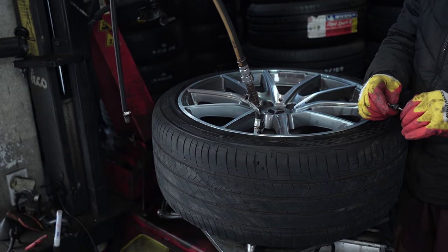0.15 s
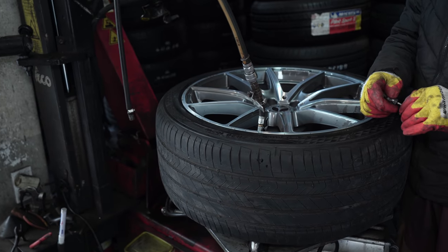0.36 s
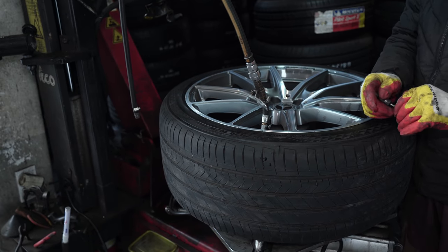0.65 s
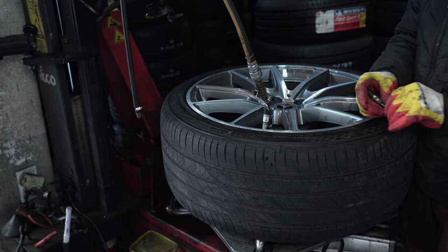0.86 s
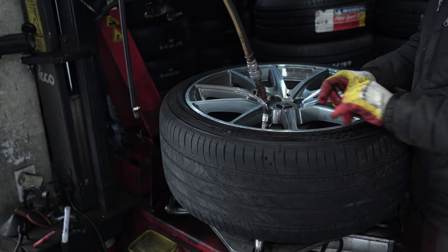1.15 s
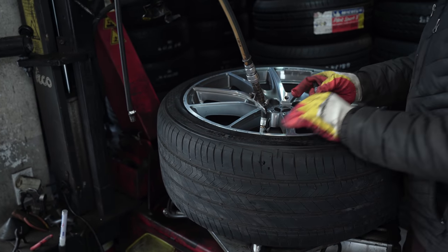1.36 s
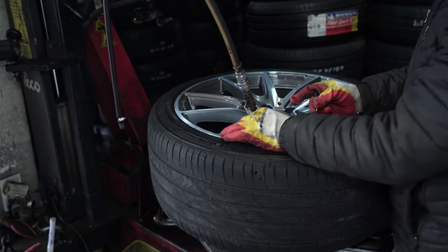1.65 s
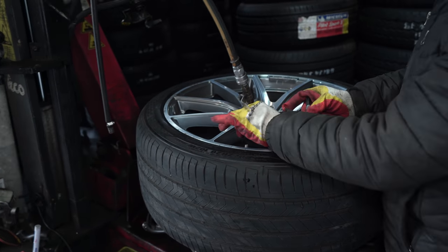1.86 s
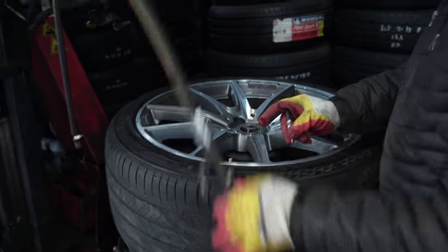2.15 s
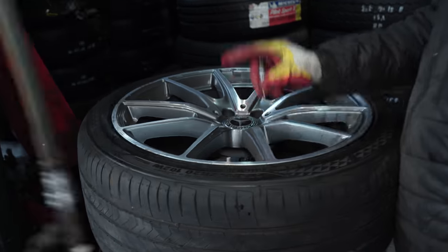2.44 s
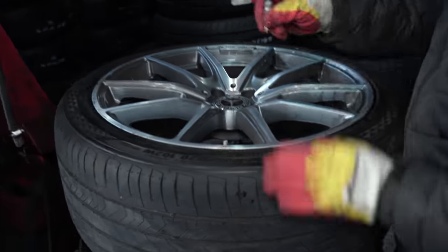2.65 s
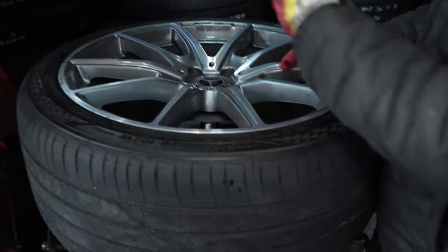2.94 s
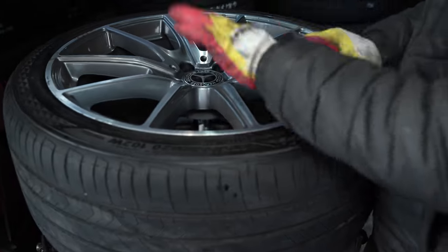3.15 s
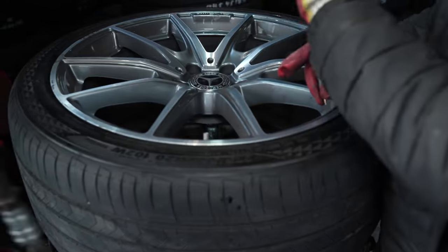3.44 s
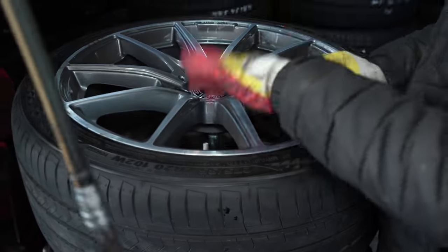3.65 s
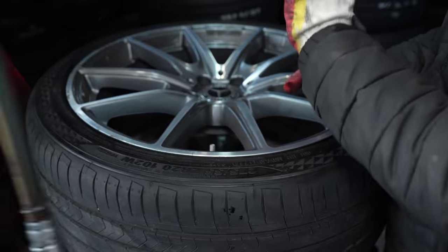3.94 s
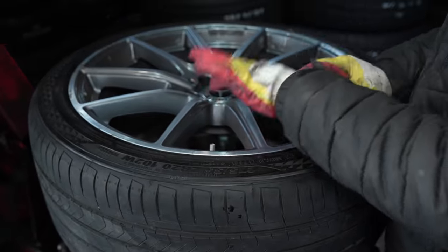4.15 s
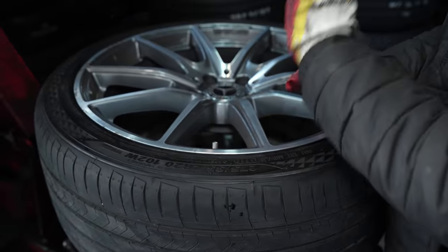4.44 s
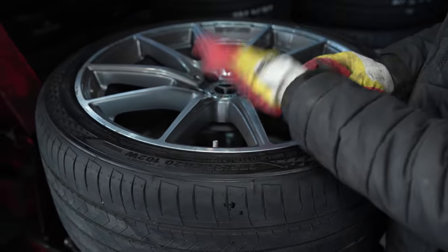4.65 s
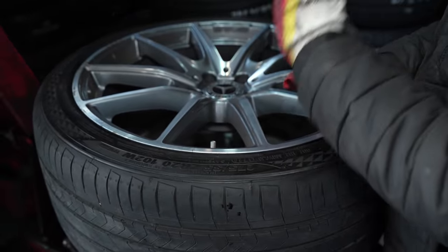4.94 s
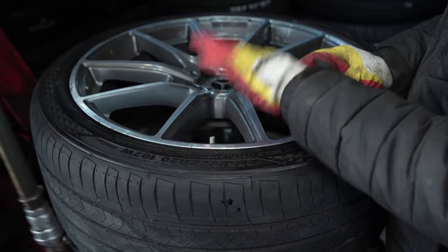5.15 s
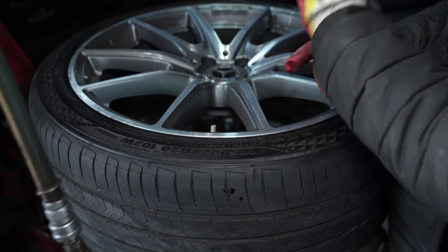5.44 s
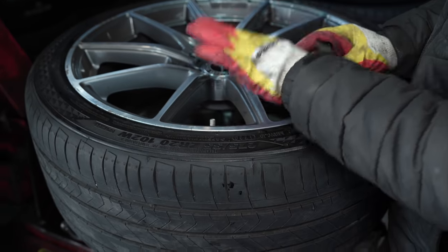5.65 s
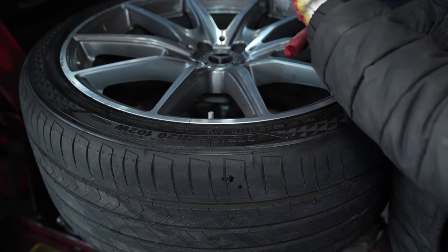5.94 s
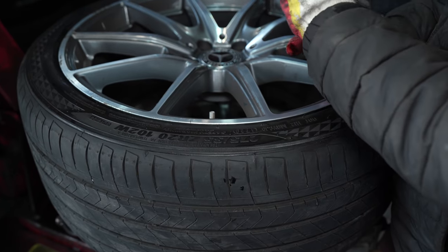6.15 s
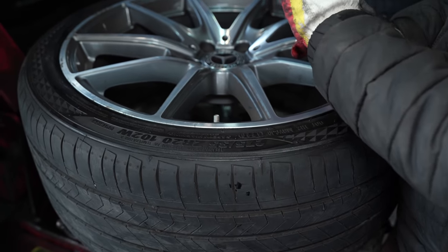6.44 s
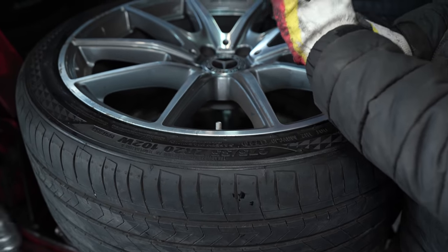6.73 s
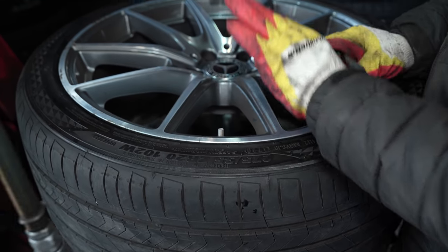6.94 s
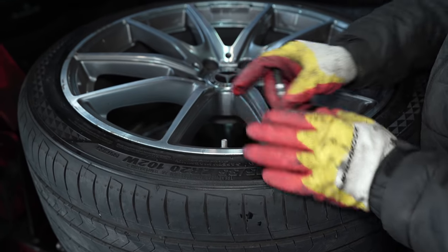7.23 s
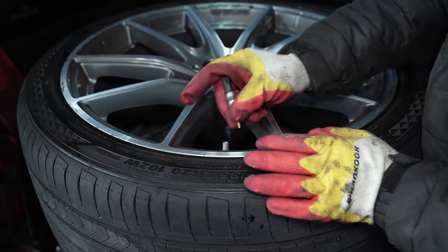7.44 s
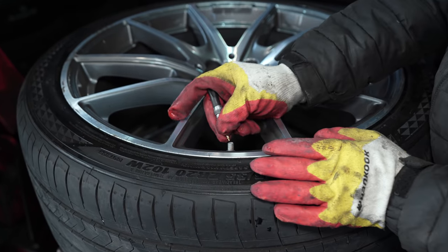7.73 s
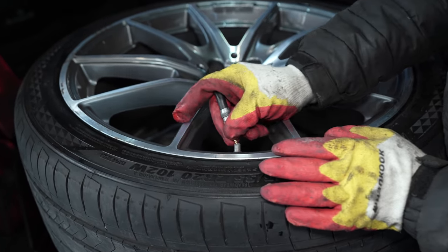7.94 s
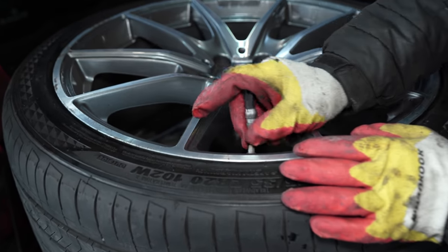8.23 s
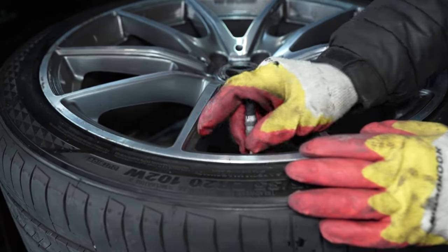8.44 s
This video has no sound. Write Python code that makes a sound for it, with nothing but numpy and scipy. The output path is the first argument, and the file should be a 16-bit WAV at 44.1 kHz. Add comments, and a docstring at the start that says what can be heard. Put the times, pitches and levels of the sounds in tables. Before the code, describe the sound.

From 0 to 1.7 seconds, air rushes into a car tyre as a muffled, cavity-coloured roar over an uneven, very low throb and hum; at about 1.3 the hiss grows slightly as the chuck is gripped. At 1.7 it leaks sharply, and at 1.8 comes off with a coarse, rasping spit. The low rush stops and a loud, bright, shrill hiss streams from the open valve, very slowly weakening. A soft puff at 2.4 is followed by stronger gruff puffs at 3.1, 3.7, 4.1, 4.6, 5.1 and 5.6 as a gloved hand crosses the jet. Steady hiss continues, with a dull pass at 6.8 and another at 7.4. Around 7.5 the glove cups the jet, making it hollower, with small flutters and faint short hums. From 8.3 it is choked ever faster, nearly silent by 8.6 over faint machine drone. Close microphone, light metallic and workshop echoes.

```python
"""A rush of air over a low throb and hum: a car tyre is filled through an air hose in a repair shop.
The chuck leaks, comes off with a spit, and air hisses from the open valve stem.
A gloved hand sweeps through the jet again and again, each pass a gruff puff; then it cups and plugs the stem.
Air sounds are noise under moving spectra; tyre cavity and alloy wheel are resonant modes.
Throb and hums are unsteady tones; delays and decaying noise tails make the echoes."""
import sys
import numpy as np
from scipy import signal
from scipy.fft import rfft, irfft, next_fast_len
from scipy.io import wavfile
from scipy.ndimage import uniform_filter1d, map_coordinates

SR = 44100
rng = np.random.default_rng(int(sys.argv[2]) if len(sys.argv) > 2 else 0)


def dump_mix(stems):
    """Bounce the given channels to the path in sys.argv[1] as a 16-bit WAV at rate SR."""
    frames = np.atleast_2d(stems).T  # one column per channel
    limited = np.clip(frames, -1, 1)  # hard clip at full scale
    pcm = np.round(limited * 32767).astype(np.int16)
    wavfile.write(sys.argv[1], SR, pcm)


N = 379260

# very low throb: t/s, level/dB
THROB_LEVEL = [(0.0, -26), (0.12, -18), (0.24, -36), (0.48, -19.5), (1.1, -34), (1.7, -13.5), (1.82, -15),
               (1.92, -50), (2.27, -52), (2.39, -37), (2.68, -30.5), (5.53, -53.5), (6.47, -36.5),
               (6.56, -44.5), (7.57, -40), (7.91, -51), (8.38, -31), (8.6, -48)]
# air rushing into the tyre, relative spectrum: f/Hz, density/dB per Hz
FILL_SPECTRUM = [(18, -31), (30, -22), (130, -26.5), (258, -18.5), (447, -26), (509, -19.5), (860, -23),
                 (1700, -23.5), (2100, -30.5), (3450, -30.5), (4260, -36), (5250, -36.5), (7780, -49),
                 (13900, -58), (15800, -65)]
# air modes of the tyre: f/Hz, width/Hz, lift/dB
CAVITY_MODES = [(88, 24, 3), (259, 5.4, 6), (291, 8.7, 2.5), (506, 36, -1.5), (514, 31, 6), (1020, 14, 4),
                (1550, 180, 1), (1750, 55, 1.5)]
# drone of the shop machines, relative spectrum: f/Hz, density/dB per Hz
MACHINE_SPECTRUM = [(30, -8), (80, 0), (140, -22), (230, 2), (400, -6), (700, 2), (1500, -6.5), (4000, -51),
                    (15000, -46)]
# free jet, relative spectrum: f/Hz, density/dB per Hz
OPEN_JET_SPECTRUM = [(35, -58), (60, -26), (167, -39.5), (436, -28), (604, -33), (727, -23), (1080, -24),
                     (1500, -18), (1810, -18), (2390, -13.5), (3310, -11), (4280, -9), (7490, -10),
                     (12800, -1), (15800, -13)]
# peaks and dips of the free jet: f/Hz, width/Hz, lift/dB
JET_BANDS = [(2900, 860, 0.7), (4320, 220, 2.5), (4900, 170, 2), (6300, 300, 2.2), (7500, 500, -2.2),
             (8800, 280, 1.2), (10100, 460, 0), (11200, 320, 1), (12400, 570, -2), (14200, 350, -1),
             (14950, 450, 3), (15700, 300, 1.5)]
# jet under the glove, relative spectrum: f/Hz, density/dB per Hz
CUPPED_JET_SPECTRUM = [(35, -61), (60, -23), (286, -16.5), (322, -27), (370, -22), (576, -24.5), (762, -15),
                       (985, -23.5), (1240, -16.5), (1940, -8.5), (2280, -7.5), (3720, -7), (6400, -8.5),
                       (8200, -10), (10800, 1.5), (14700, -2.5), (15800, -7.5)]
# shrill band, wandering as hands and microphone move: t/s, centre f/Hz, width/Hz, lift/dB
SHRILL_BAND = [(2.0, 11400, 900, 0), (2.4, 12400, 1100, 2.5), (3.1, 12400, 1000, -1),
               (3.55, 12600, 1300, 5), (4.15, 13100, 480, 3.5), (5.6, 12950, 450, 3.5),
               (6.3, 13100, 910, 4.5), (7.4, 12470, 850, 4), (8.3, 11200, 900, 1.5)]
# something crosses the jet: start t/s, length/s, level/dB, top of the roar at mid-stroke f/Hz,
# rasp lift/dB, share of the stroke spent entering/0-1
JET_PASSES = [(1.802, 0.06, -19, 6000, -3, 0.2), (1.828, 0.031, -10.5, 6600, 9, 0.5),
              (1.85, 0.18, -24, 3530, 5, 0.36), (2.002, 0.064, -21, 5400, 3, 0),
              (2.438, 0.22, -27.5, 2100, -2, 0.1), (3.084, 0.32, -20.5, 2970, 0, 0.2),
              (3.666, .225, -17.5, 4150, -1, 0.06), (4.121, 0.21, -18.5, 3830, 0.5, 0.06),
              (4.584, 0.23, -17.5, 5240, 1, 0.08), (5.078, 0.24, -19, 4840, -0.5, 0.08),
              (5.59, 0.24, -19, 3100, 3.5, 0.11), (6.838, 0.42, -32, 1650, -2, 0.17),
              (7.355, 0.3, -25, 3020, -1, 0.44), (7.578, 0.18, -37.5, 1000, 5, 0.1),
              (7.76, 0.13, -30.5, 4500, 2, 0.2), (8.098, 0.25, -31, 3400, 6, 0.27)]
# roar of the deflected jet, relative spectrum: f/Hz, density/dB per Hz
ROAR_SPECTRUM = [(40, -34), (130, -20), (280, -15), (520, -13), (780, -5), (1200, -3.5), (2000, 0.5),
                 (3200, 4.5), (5000, 4.5), (9000, 4.5), (16000, 7)]
# modes of the alloy wheel: f/Hz, width/Hz, lift/dB
WHEEL_MODES = [(500, 27, 3.5), (707, 12, -4), (1014, 28, 4.5), (1380, 26, 3), (1440, 130, 2), (2016, 26, 4),
               (2767, 39, 4), (3660, 49, 2), (4320, 180, 1.5), (5120, 64, 3.5), (6360, 200, 0.5)]
# echo of the jet off the wheel: t/s, delay/ms, strength/factor
WHEEL_ECHO = [(1.8, 2.36, .1), (2.15, 2.66, 0.24), (2.55, 2.6, 0.14), (2.85, 2.7, 0.062), (6.5, 2.7, 0.084),
              (8.6, 2.34, 0.12)]
# shop reverberation: f/Hz, t60/s
SHOP_DECAY = [(100, 1), (500, 0.77), (2000, 0.54), (6000, 0.19), (15000, 0.37)]
# faint short hums: start t/s, length/s, f/Hz, level/dB
SHORT_HUMS = [(7.615, 0.15, 292, -46), (7.64, 0.1, 733, -41), (7.844, .19, 324, -45.5)]
# low peaks and dips at the microphone's place: f/Hz, width/Hz, lift/dB
LOW_END_MODES = [(35, 18, 8.5), (100, 12, 1.5), (144, 44, -6.5), (170, 13, 3)]

TIME = np.arange(N) / SR
FFT_SIZE, HOP = 512, 128
FRAME_S = np.arange(N // HOP + 5)[:, None] * HOP / SR
BIN_HZ = np.fft.rfftfreq(FFT_SIZE, 1 / SR)

THROB_HZ = 15
HUM_HZ, HUM_FILLING_DB, HUM_OPEN_DB = 56, -40, -64
FILL_DB, FILL_HISS_DB = -28, 0.5  # hiss is relative to the fill
GRIP_S, GRIP_LENGTH_S, GRIP_HISS_DB = 1.25, 0.15, 1.5  # the hand takes hold of the chuck: more hiss
LEAK_S, LEAK_RISE_S, LEAK_DB = 1.717, 0.053, -14  # the loosened chuck leaks
CHUCK_OFF_S, CHUCK_FADE_S = 1.818, 0.022
SPIT_DB, SPIT_FADE_S = 6, 0.15  # coarser while the chuck is still in front of the jet
JET_DB, JET_SAG_DB_PER_S = -17, 0.3369  # weakens as the tyre empties
CUP_S, CUP_LENGTH_S, OPEN_CUPPING = 7.54, 0.13, 0.073  # cupping/0-1 before the glove closes
PLUG_S, PLUG_LENGTH_S, PLUG_DB = 8.326, 0.27, -45
SHOP_BUILD_S = 0.058  # time for the echoes to gather
EDGE_HZ = 15850


def gain_of(db):
    """Decibels to a factor."""
    return 10 ** (np.asarray(db) / 20)


def evened(x):
    """Scaled to rms 1."""
    return x / np.sqrt(np.mean(x ** 2) + 1e-20)


def ramp(t, start_s, length_s):
    """Rises from 0 to 1 over a length of time."""
    return np.clip((t - start_s) / length_s, 0, 1)


def read(points, hz):
    """A curve interpolated on a log-frequency axis."""
    f, value = np.transpose(points)
    return np.interp(np.log(hz + 1), np.log(f + 1), value)


def follow(rows, t):
    """Each column of a curve at the times t."""
    s, *columns = np.transpose(rows)
    return [np.interp(t, s, column) for column in columns]


def wander(per_s):
    """A slow random drift of rms 1."""
    knots = rng.standard_normal(400)
    return evened(np.interp(TIME * per_s, np.arange(len(knots)), knots))


def in_band(shape, band):
    """Scales a spectrum so that noise given its shape has rms 1 inside the band."""
    return shape / np.sqrt(np.mean(shape ** 2 * band, axis=-1, keepdims=True) + 1e-20)


def turbulence(shape, flutter_db, patchy_db):
    """Noise under a moving spectrum; eddies shake all bands at once and in patches."""
    size = (len(FRAME_S), len(BIN_HZ))
    flutter = evened(uniform_filter1d(rng.standard_normal((size[0], 1)), size=4, axis=0))
    patches = uniform_filter1d(rng.standard_normal(size), size=18, axis=0)
    patches = evened(uniform_filter1d(patches, size=12, axis=1))
    noise = rng.standard_normal(N + 1024)
    white = signal.stft(noise, nperseg=FFT_SIZE, noverlap=FFT_SIZE - HOP)[2].T[:size[0]]
    shaped = white * shape * gain_of(flutter_db * flutter + patchy_db * patches)
    return signal.istft(shaped.T, nperseg=FFT_SIZE, noverlap=FFT_SIZE - HOP)[1][:N]


def ring(x, modes):
    """Each mode lifts a narrow band and rings on; a negative lift cuts a dip."""
    size = next_fast_len(N + SR // 2, True)
    f = np.fft.rfftfreq(size, 1 / SR)
    body = 1 + sum((gain_of(db) - 1) / (1 + 2j * (f - hz) / width) for hz, width, db in modes)
    return irfft(rfft(x, size) * body, size)[:N]


def delayed(x, ms):
    """The sound after a path whose length changes."""
    return map_coordinates(x, [np.arange(N) - ms * SR / 1000], order=3)


def rumble(throb_waver_hz=1.5, wavers_per_s=13, hum_fade_s=0.064):
    """A very low throb and an unsteady hum, both strongest while the hose feeds the tyre."""
    throb_turns = np.cumsum(THROB_HZ + throb_waver_hz * wander(wavers_per_s)) / SR
    throb_db = follow(THROB_LEVEL, TIME)[0]
    throb = np.sqrt(2) * gain_of(throb_db) * np.sin(2 * np.pi * throb_turns)
    hum_db = HUM_FILLING_DB + (HUM_OPEN_DB - HUM_FILLING_DB) * ramp(TIME, CHUCK_OFF_S, hum_fade_s)
    unsteady = wander(wavers_per_s) + 1j * wander(wavers_per_s)
    hum = (unsteady * np.exp(2j * np.pi * HUM_HZ * TIME)).real
    return throb + gain_of(hum_db) * hum


def filling(hiss_hz=2200):
    """Air roars into the tyre, muffled by rubber and coloured by the cavity, until the chuck is off."""
    hiss_db = FILL_HISS_DB + GRIP_HISS_DB * ramp(FRAME_S, GRIP_S, GRIP_LENGTH_S)
    shape = in_band(gain_of(read(FILL_SPECTRUM, BIN_HZ)), BIN_HZ < hiss_hz)
    shape = shape * gain_of(FILL_DB + hiss_db * (BIN_HZ > hiss_hz))
    seated = 1 - ramp(TIME, CHUCK_OFF_S, CHUCK_FADE_S)
    return ring(seated * turbulence(shape, flutter_db=0.67, patchy_db=1.04), CAVITY_MODES)


def machines(level_db=-52):
    """The dull, steady noise of the shop's machines."""
    colour = gain_of(read(MACHINE_SPECTRUM, np.fft.rfftfreq(N, 1 / SR)))
    return gain_of(level_db) * evened(irfft(rfft(rng.standard_normal(N)) * colour, N))


def jet(roar_hz=8500, roar_db=-0.7, roar_follows=0.63, plug_curve=2.17,
        chuck_cupping=0.6, chuck_treble_db=-2, cup_db=0.75):
    """The jet hisses with a shrill band; chuck and glove hollow it, throttling takes treble first."""
    leak_db = LEAK_DB * (1 - ramp(FRAME_S, CHUCK_OFF_S, CHUCK_FADE_S))
    plug_db = PLUG_DB * ramp(FRAME_S, PLUG_S, PLUG_LENGTH_S) ** plug_curve  # ever faster
    throttle_db = leak_db + plug_db
    open_s = np.maximum(FRAME_S - CHUCK_OFF_S, 0)
    chuck_near = np.exp(-(open_s / SPIT_FADE_S) ** 2)
    glove_cupping = ramp(FRAME_S, CUP_S, CUP_LENGTH_S)
    cupping = np.clip(OPEN_CUPPING + chuck_cupping * chuck_near + glove_cupping, 0, 1)

    bands_db = sum(lift * np.exp(-((BIN_HZ - hz) / width) ** 2) for hz, width, lift in JET_BANDS)
    free_db = read(OPEN_JET_SPECTRUM, BIN_HZ) + bands_db
    colour_db = (1 - cupping) * free_db + cupping * read(CUPPED_JET_SPECTRUM, BIN_HZ)

    centre_hz, width_hz, lift_db = follow(SHRILL_BAND, FRAME_S)
    shrill_db = lift_db * np.exp(-((BIN_HZ - centre_hz) / width_hz) ** 2)
    treble_db = throttle_db + chuck_treble_db * chuck_near + shrill_db
    body_db = roar_follows * throttle_db + roar_db + SPIT_DB * chuck_near
    body = 1 / (1 + (BIN_HZ / roar_hz) ** 8)  # share of each bin below the crossover
    level_db = JET_DB - JET_SAG_DB_PER_S * open_s + cup_db * cupping
    level_db = level_db + body * body_db + (1 - body) * treble_db
    shape = in_band(gain_of(colour_db), BIN_HZ > roar_hz) * gain_of(level_db)
    return turbulence(shape * ramp(FRAME_S, LEAK_S, LEAK_RISE_S), flutter_db=0.46, patchy_db=1.0)


def passes(edge_top=0.31, leaving=0.3, lean=0.67, late_lean=0.96, steepness=4.2,
           rasp_place=0.63, rasp_octaves=0.33):
    """An obstacle in the jet roars: dull at the jet's edge, brightest in its fast core."""
    power = np.zeros((len(FRAME_S), len(BIN_HZ)))
    roar = gain_of(read(ROAR_SPECTRUM, BIN_HZ))
    for start_s, length_s, db, top_hz, rasp_db, entering in JET_PASSES:
        way = (FRAME_S - start_s) / length_s
        inside = ((way > 0) & (way < 1))[:, 0]
        way = way[inside]
        depth = np.sin(np.pi * way ** (lean + late_lean * entering))  # a gentle entry peaks later
        contact = np.clip(np.minimum(way / entering, (1 - way) / leaving), 0, 1)
        cut_hz = top_hz * (edge_top + (1 - edge_top) * depth ** 2)
        # shed eddies favour a band that rises with the air speed
        octaves_off = np.log2((BIN_HZ + 1) / (rasp_place * cut_hz))
        rasp = gain_of(rasp_db * np.exp(-(octaves_off / rasp_octaves) ** 2))
        stroke = (contact * roar * rasp) ** 2 / (1 + (BIN_HZ / cut_hz) ** steepness)
        power[inside] += gain_of(db) ** 2 * stroke / stroke.mean(1).max()
    return turbulence(np.sqrt(power), flutter_db=0.7, patchy_db=0.46)


def near_echoes(x, count=3, echo_db=-16, drift_ms=0.14):
    """Wheel and machine throw the jet back; the paths drift as the microphone moves."""
    wheel_ms, strength = follow(WHEEL_ECHO, TIME)
    out = x + strength * delayed(x, wheel_ms)
    for path_ms, (spread, rate, phase) in zip(np.geomspace(6, 18, count), rng.random((count, 3))):
        drift_hz = 0.1201 + 0.32 * rate
        drift = drift_ms * np.sin(2 * np.pi * (drift_hz * TIME + phase))
        out += gain_of(echo_db) * delayed(x, path_ms * (1 + 0.2 * spread) + drift)
    return out / np.sqrt(1 + strength ** 2 + count * gain_of(echo_db) ** 2)


def shop(x, count=6, wet_db=-12):
    """Diffuse tails, each band dying at its own speed; one gives way to the next as the arm moves."""
    hz, t, z = signal.stft(rng.standard_normal((count, SR // 2)), SR, nperseg=256)
    decay_db = -60 * t / read(SHOP_DECAY, hz)[:, None]
    tails = signal.istft(z * gain_of(decay_db), SR)[1]
    tails *= ramp(np.arange(tails.shape[1]) / SR, 0, SHOP_BUILD_S)
    place = np.linspace(0, count - 1, N)
    wet = np.zeros(N + SR)
    for k, tail in enumerate(tails):
        near = np.flatnonzero(abs(place - k) < 1)
        crossfade = np.cos(np.pi / 2 * (place[near] - k))
        part = signal.fftconvolve(x[near] * crossfade, tail / np.linalg.norm(tail))
        wet[near[0]:near[0] + len(part)] += part
    return (x + gain_of(wet_db) * wet[:N]) / np.sqrt(1 + gain_of(wet_db) ** 2)


def short_hums(waver=0.013):
    """Faint, unsteady tones while the glove closes on the stem."""
    out = np.zeros(N)
    for start_s, length_s, hz, db in SHORT_HUMS:
        during = (TIME > start_s) & (TIME < start_s + length_s)
        swell = np.sin(np.pi * (TIME[during] - start_s) / length_s)
        drift = evened(uniform_filter1d(rng.standard_normal(SR), size=900))[:len(swell)]
        turns = np.cumsum(hz * (1 + waver * drift)) / SR
        out[during] += np.sqrt(2) * gain_of(db) * swell * np.sin(2 * np.pi * turns)
    return out


def scene(lowest_hz=140):
    """All sources reach one microphone; the small jet radiates no bass."""
    high_pass = signal.butter(3, lowest_hz, "high", fs=SR, output="sos")
    air = signal.sosfilt(high_pass, jet())
    escaping = near_echoes(ring(air + passes(), WHEEL_MODES))
    coloured = ring(filling() + shop(escaping) + machines(), LOW_END_MODES)
    mono = rumble() + coloured + short_hums()
    return np.array([mono, mono])


def record(dry):
    """The tallest peaks are clipped; then the band limit."""
    held = np.clip(dry, -0.85, 0.85)
    low_pass = signal.firwin(611, EDGE_HZ, window=("kaiser", 9), fs=SR)
    return signal.oaconvolve(held, low_pass[None], "same")


dry = scene()
out = record(dry)
dump_mix(out)
```